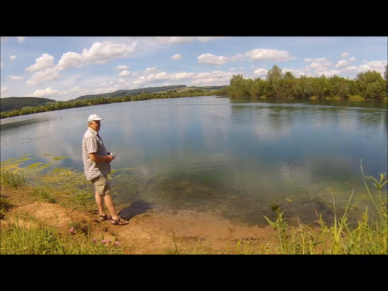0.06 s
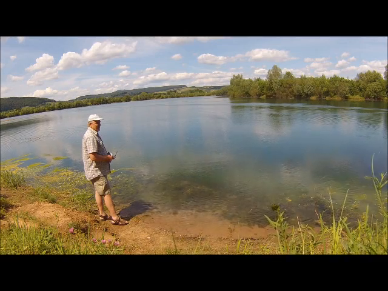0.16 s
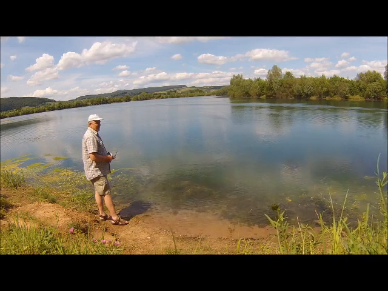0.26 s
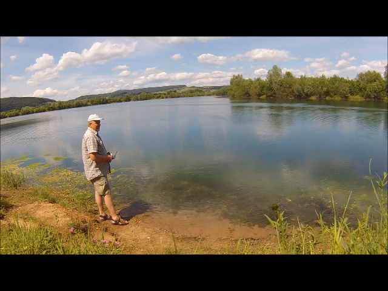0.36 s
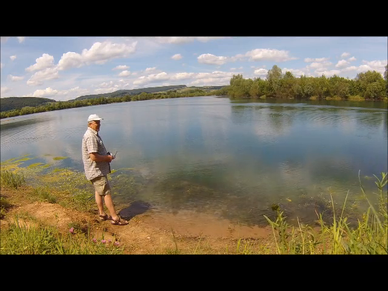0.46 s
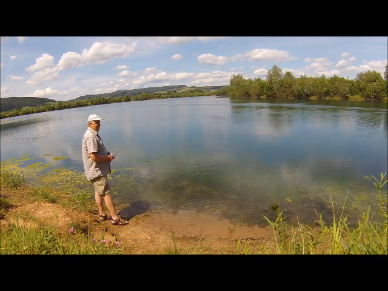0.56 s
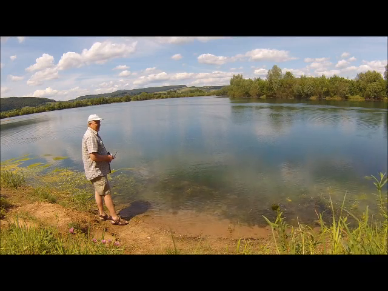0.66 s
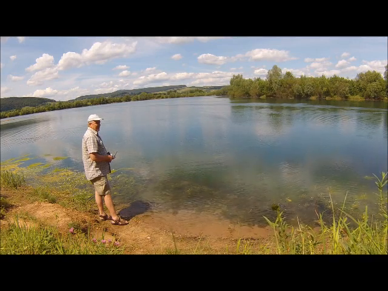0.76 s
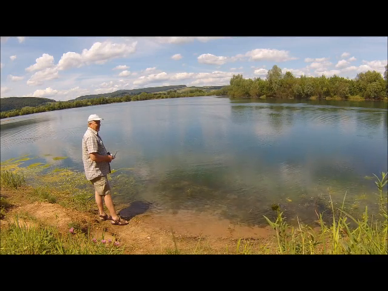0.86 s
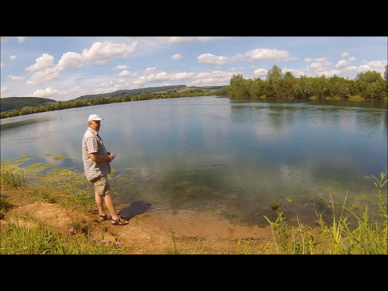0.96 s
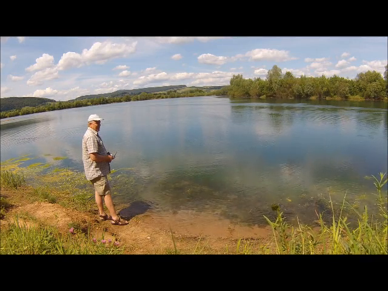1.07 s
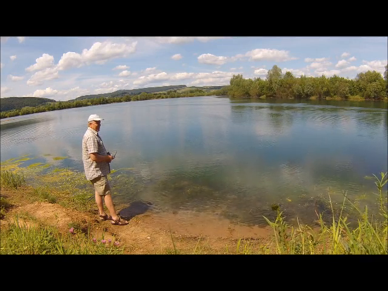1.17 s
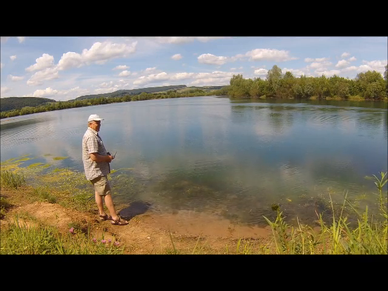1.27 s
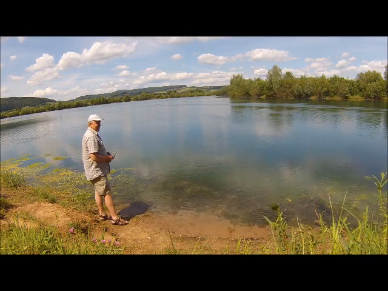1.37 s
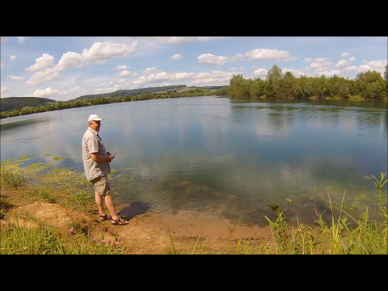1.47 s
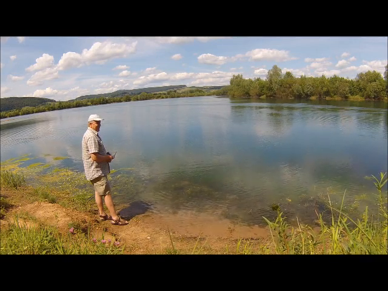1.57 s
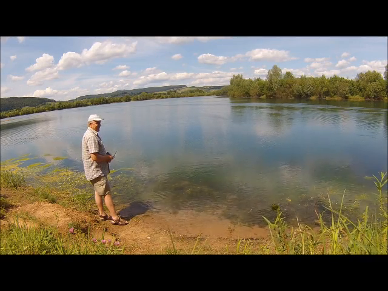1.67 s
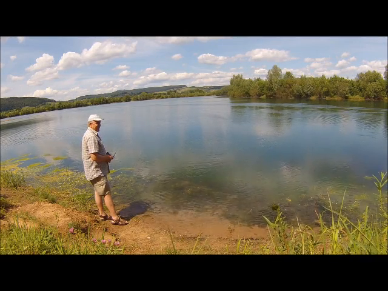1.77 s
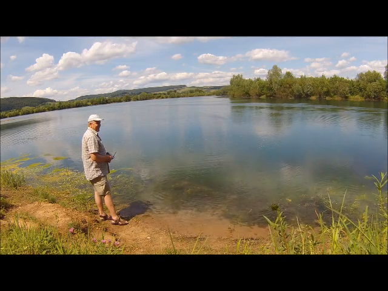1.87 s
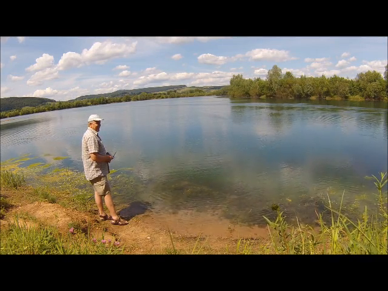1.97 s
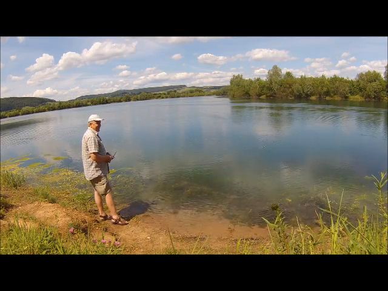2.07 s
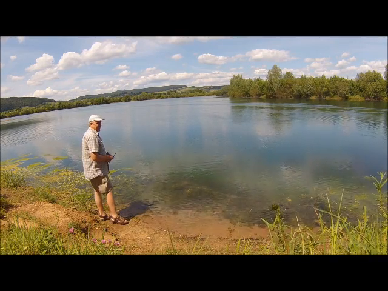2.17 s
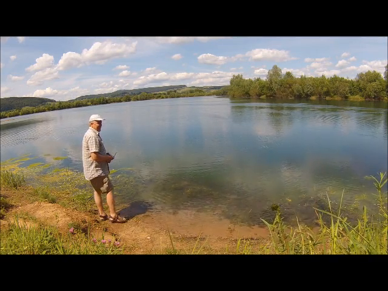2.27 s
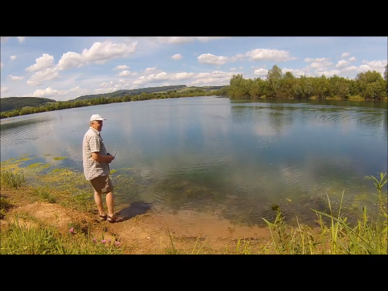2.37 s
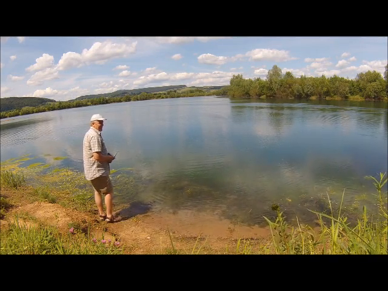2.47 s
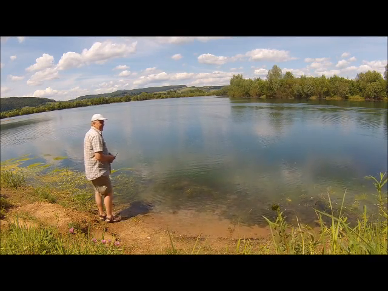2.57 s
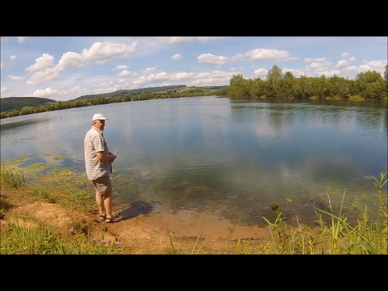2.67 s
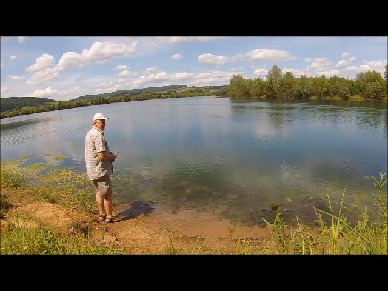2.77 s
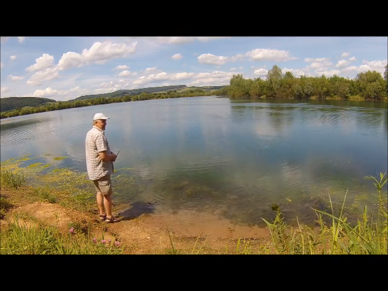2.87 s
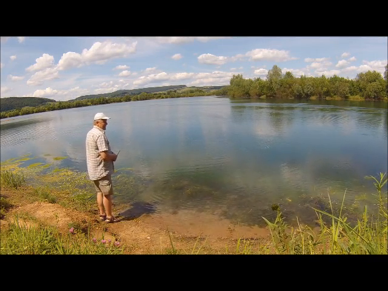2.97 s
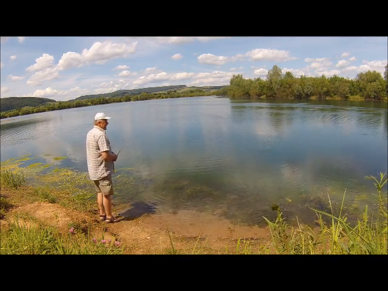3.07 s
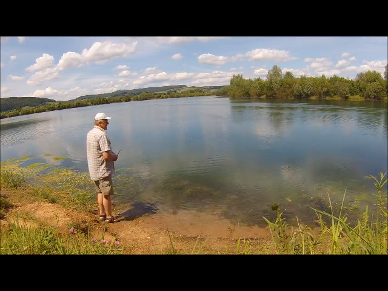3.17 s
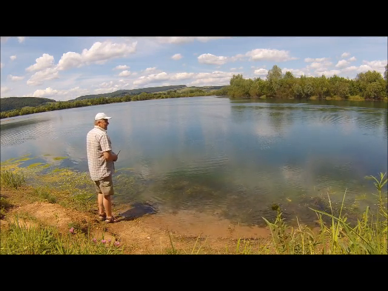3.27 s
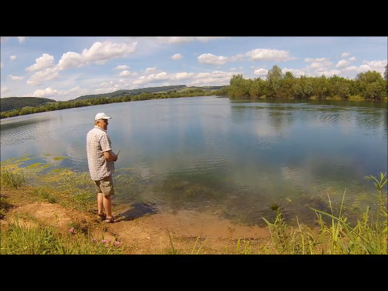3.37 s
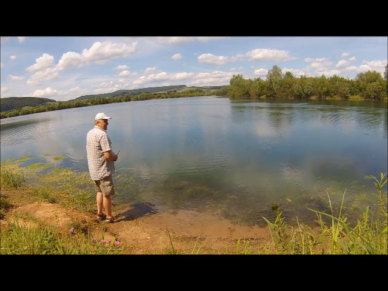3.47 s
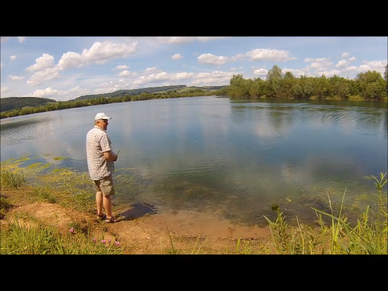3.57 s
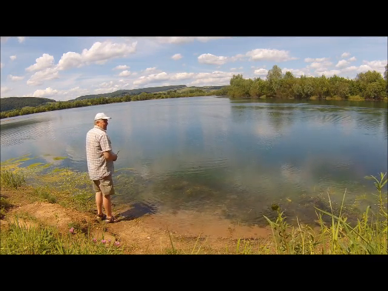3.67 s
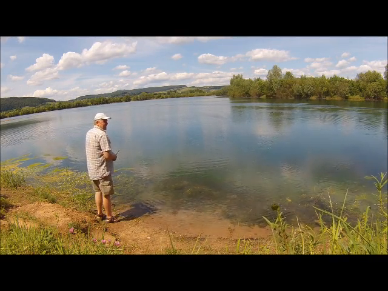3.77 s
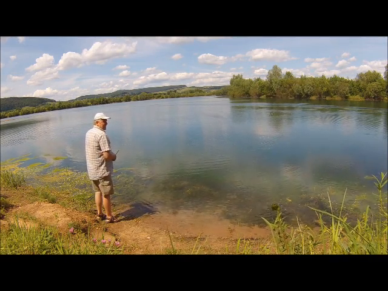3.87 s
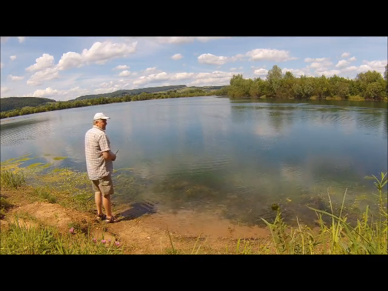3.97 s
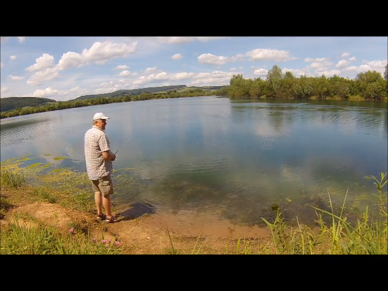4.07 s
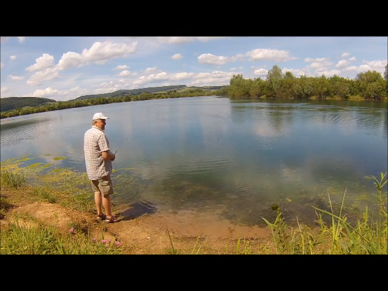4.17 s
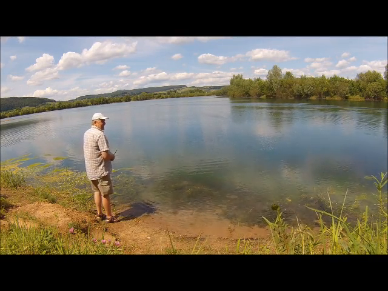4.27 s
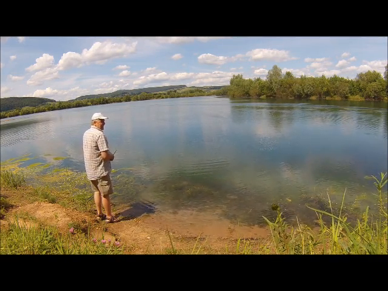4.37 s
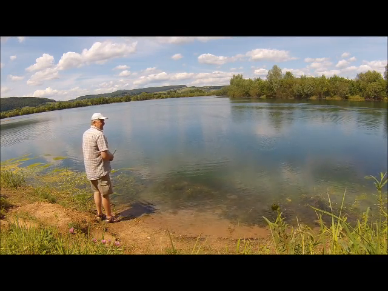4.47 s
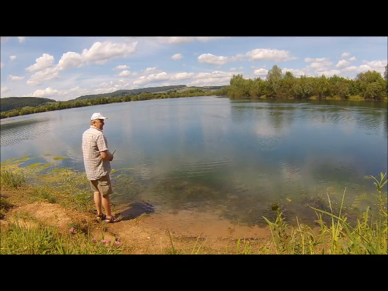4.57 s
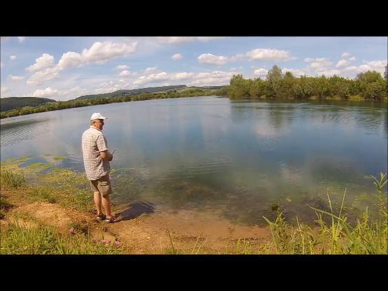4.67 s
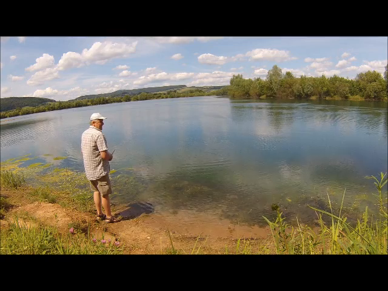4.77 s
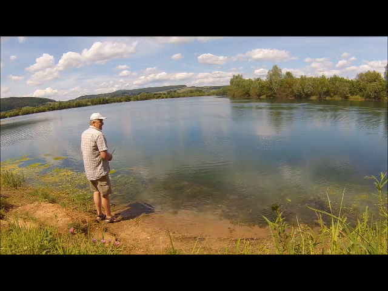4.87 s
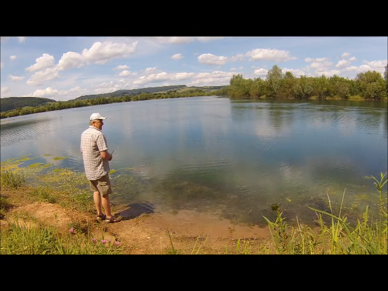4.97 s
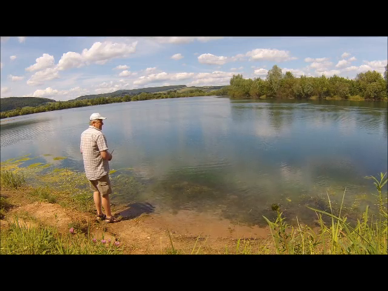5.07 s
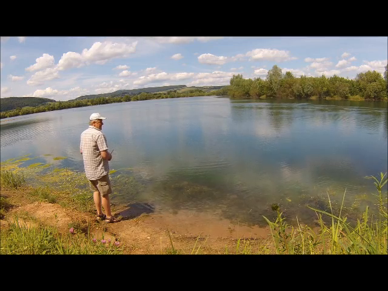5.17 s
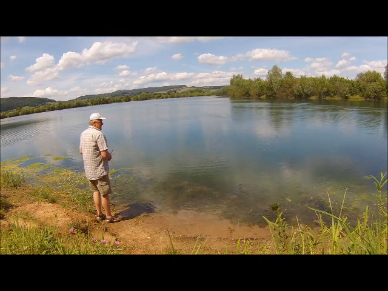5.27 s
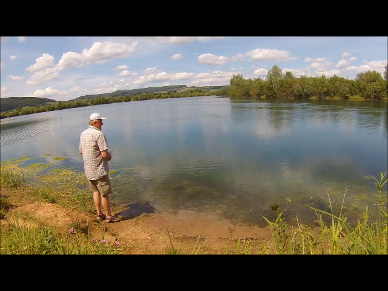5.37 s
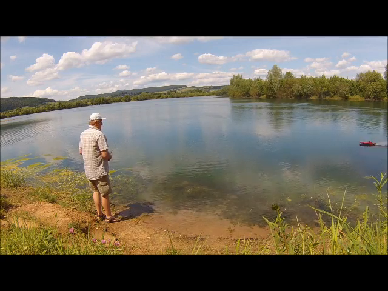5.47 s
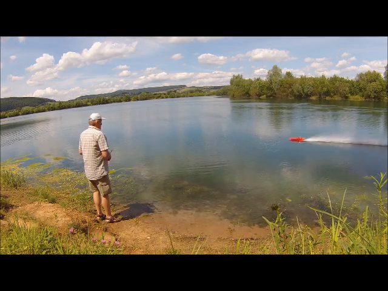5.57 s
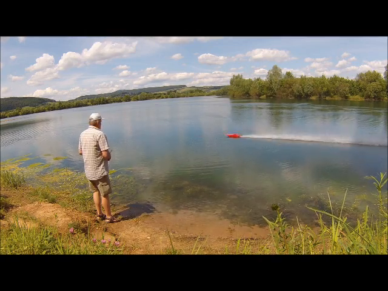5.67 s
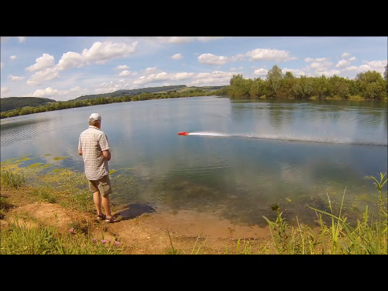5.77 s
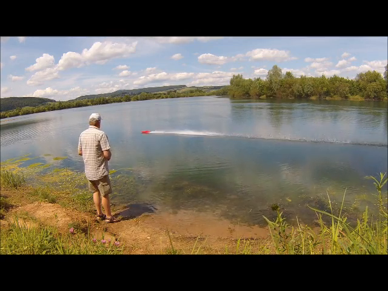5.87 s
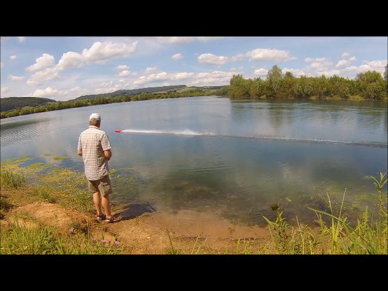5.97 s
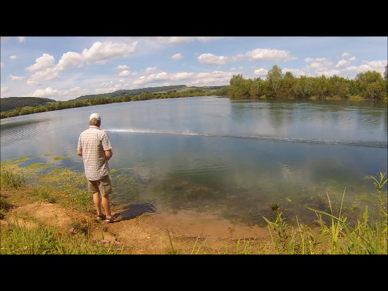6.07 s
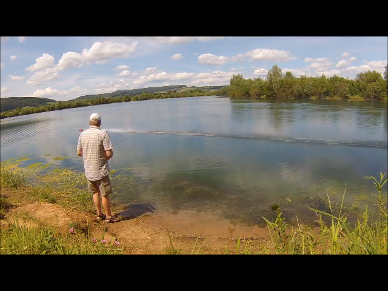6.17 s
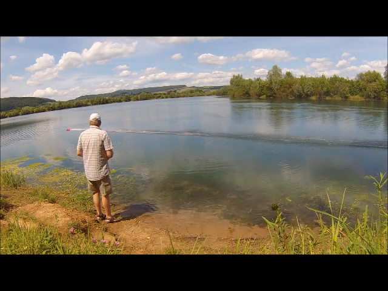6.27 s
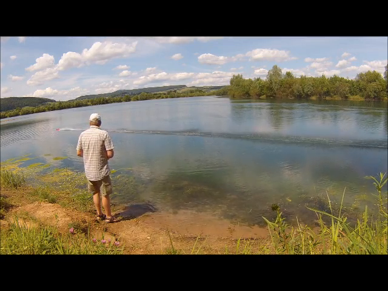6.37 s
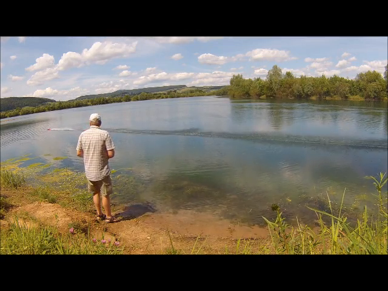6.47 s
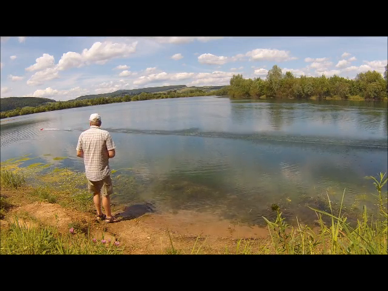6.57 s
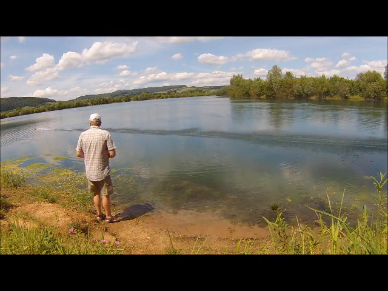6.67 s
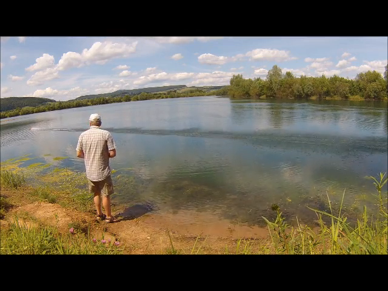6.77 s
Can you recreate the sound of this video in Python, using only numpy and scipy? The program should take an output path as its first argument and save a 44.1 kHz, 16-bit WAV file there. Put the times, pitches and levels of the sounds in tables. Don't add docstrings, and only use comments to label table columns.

```python
import sys
import numpy as np
from scipy import signal
from scipy.fft import rfft, irfft, next_fast_len
from scipy.io import wavfile
from scipy.ndimage import uniform_filter1d, minimum_filter1d

SR = 44100
rng = np.random.default_rng(int(sys.argv[2]) if len(sys.argv) > 2 else 0)


def ratio_of_db(decibels):
    return 10 ** (np.asarray(decibels, float) / 20)


def log_audio(samples):
    frames = np.atleast_2d(samples).T
    limited = np.clip(frames, -1, 1)
    pcm = np.round(limited * 32767).astype(np.int16)
    wavfile.write(sys.argv[1], SR, pcm)


N = 300321
T = np.arange(N) / SR

NEAR = np.clip((T - 2.25) / 0.02, 0, 1)
FULL = np.clip(np.minimum(T - 5.1, 5.86 - T) / 0.22, 0, 1)
COASTING = np.clip((T - 5.83) / 0.1, 0, 1)

# freq_hz, density_db_per_hz
SPRAY_SPECTRUM = [(790, 21), (1350, -12), (1460, -15.5), (1630, -18), (2040, -20), (2430, -14.5),
                  (2800, -3), (3590, -8.5), (4500, -15), (5850, -41), (9900, -120)]
# centre_s, level_db, length_s
SPLASHES = [(3.2, 0.5, 0.046), (4.47, 4, 0.011), (5.06, 3, 0.037), (5.13, 2, 0.017), (5.3, -2.5, .04),
            (5.5, -3.5, 0.028), (5.21, 6, 0.059), (5.4, 6.5, 0.061), (5.66, 3.5, 0.017), (5.88, -1, 0.039),
            (6.1, 2.5, 0.074)]
# centre_s, level_db, length_s
CHURN = [
    (2.4, 2, .15),
    (3.4, 3, 0.092),
    (3.9, 3, 0.19),
    (4.4, -6, 0.33),
    (4.66, 6, 0.066),
    (4.95, -1, 0.056),
    (5.42, 6, 0.13),
    (6.38, -1, 0.19),
    (6.68, 3.5, 0.11),
]


def curves(table):
    s, *columns = np.transpose(table)
    return [np.interp(T, s, column) for column in columns]


def bumps(rows):
    out = np.zeros(N)
    for s, size, length_s in rows:
        first = max(int((s - 3 * length_s) * SR), 0)
        part = slice(first, int((s + 3 * length_s) * SR))
        out[part] += size * np.exp(-((T[part] - s) / length_s) ** 2)
    return out


def colour_db(spectrum, hz):
    table_hz, table_db = np.transpose(spectrum)
    return np.interp(np.log(hz), np.log(table_hz), table_db)


def walk(rate_hz):
    hold = int(SR / rate_hz)
    steps = np.repeat(rng.standard_normal(N // hold + 1), hold)
    x = uniform_filter1d(uniform_filter1d(steps, hold), hold)[:N]
    return x / x.std()


def noise(spectrum, lo_hz, hi_hz, ref_hz=None, grain_db=0.0):
    size = next_fast_len(N)
    hz = np.arange(size // 2 + 1) * SR / size + 1
    power_order = 2 / 0.11
    edges = 1 / np.sqrt((1 + (lo_hz / hz) ** power_order) * (1 + (hz / hi_hz) ** power_order))
    grains_db = grain_db * np.minimum(rng.exponential(size=size), 6)
    source = rng.standard_normal(size) * ratio_of_db(grains_db)
    shaped = rfft(source) * ratio_of_db(colour_db(spectrum, hz)) * edges
    lo, hi = ref_hz or (lo_hz, hi_hz)
    power = 2 * np.sum(np.abs(shaped[(hz > lo) & (hz < hi)]) ** 2) / size ** 2
    return irfft(shaped, size)[:N] / np.sqrt(power)


def drive():
    shaft = shaft_motion()
    return shaft_and_blades(shaft) + pole_whine(shaft) + hull_rocking(shaft) + blade_slaps(shaft)


def shaft_motion():
    # start_s, shaft_hz, drive_db
    far = [
        (0.0, 140.6, -63),
        (.1, 139.7, -56.5),
        (.42, 118.1, -59),
        (.87, 118.1, -58.5),
        (1.05, 69.6, -70.5),
        (1.18, 53.3, -59.5),
        (1.27, 74, -71.5),
        (1.43, 157.4, -61),
        (2.17, 149.4, -59.5),
    ]
    # start_s, shaft_hz, drive_db
    run_in = [(2.271, 189.3, -57.5), (2.37, 212, -55), (2.8, 202.2, -54), (3.16, 329, -44),
              (3.59, 306, -47), (3.741, 327.4, -45.5), (3.9, 401, -45), (4.391, 383, -38.5),
              (4.56, 451, -35.5), (4.75, 441.8, -34), (4.89, 399, -37.5), (5.05, 430.2, -33.5),
              (5.26, 522.6, -25.5), (5.76, 499, -20), (5.84, 401, -31), (6.07, 305.2, -38.5),
              (6.45, 208.1, -36.5), (6.6, 210.6, -39), (6.81, 262.7, -43)]
    # centre_s, speed_change_percent, length_s
    surges = [(.45, 2.5, 0.027), (.54, -3, 0.034), (.67, 3, .04), (.755, -3.5, 0.042), (.93, 6, 0.053),
              (1.46, 6, 0.043), (1.595, -5.5, 0.075), (1.74, 1.5, 0.045), (1.93, -3, 0.07),
              (2.46, 8.5, 0.078), (3.21, 4.5, 0.029), (4.07, 3, 0.077), (4.21, -1.5, 0.054),
              (4.46, -2, 0.0283), (4.775, 9, 0.037), (3.39, 2.5, .07), (5.18, -3, 0.051), (5.31, 1, 0.03),
              (5.4, -3.5, 0.03), (5.48, 1.74, 0.03), (5.585, -2, .025), (3.96, 2, .04)]
    hz, drive_db = curves(far + run_in)
    hz = hz * (1 + bumps(surges) / 100)
    turn_rad = 2 * np.pi * np.cumsum(hz * (1 + 0.00413 * walk(30))) / SR
    return hz, drive_db, turn_rad


def tone(shaft, order, db, flutter_db, blur_rad=0.0):
    turn_rad = shaft[2]
    wander_rad = blur_rad * walk(40 + 4 * order) + 2 * np.pi * rng.random()
    flutter = 0.9 * walk(20 + 5 * order) + 0.3 * walk(11)
    return np.sqrt(2) * ratio_of_db(db + flutter_db * flutter) * np.sin(order * turn_rad + wander_rad)


def housed_db(shaft, order, db):
    # freq_hz, gain_db
    housing = [(200, 0.2), (650, 0), (800, 4), (1000, 2.5), (1300, -10.5), (1650, -13.5), (2100, -5),
               (2750, 6)]
    hz, drive_db, _ = shaft
    return drive_db + db + colour_db(housing, order * hz)


def shaft_and_blades(shaft):
    # centre_s, level_db, length_s
    shaft_fades = [(1.9, 3, 0.045), (3.16, 4, 0.15), (4.5, -4, 0.11), (4.58, -8, 0.019), (5.7, -9, 0.04),
                   (3.583, -38, 0.12), (3.9, -3, 0.023), (5.3, -2, 0.018), (4.46, 4.5, 0.048),
                   (5.326, -5, 0.037), (6.3, -8, 0.021), (3.67, 12, .04), (5.5, 1.5, 0.024),
                   (5.552, -20, .025), (3.4, -2, 0.026), (3.05, 3, 0.023), (5.62, 4, 0.015),
                   (5.738, -9, 0.022), (5.875, 16.5, 0.036), (5.5, 6.5, 0.022), (5.8, -7.5, 0.071),
                   (5.782, 13, 0.023), (5.96, 4.5, .025), (5.6, 5, .03), (5.7, -6, 0.034), (3.4, -6, 0.011),
                   (4.65, -17, 0.017), (3.6, -6, .015), (4.3, 3, .03), (5.25, 2.5, 0.034), (5.37, 4.5, .02),
                   (5.63, 1.5, 0.026), (6.4, 4, .03)]
    blade_fades = [(3.52, 5, .04), (.44, 6.5, 0.033), (0.91, -5, 0.041), (1.48, -10.5, 0.15),
                   (2.2, -11, 0.017), (2.364, -4, 0.1), (3.21, -24, 0.025), (3.59, -4.5, 0.086),
                   (3.73, 5.5, 0.029), (3.9, -31, 0.0061), (4.03, 8.5, 0.16), (4.11, -12, 0.013),
                   (4.2, -3, .04), (4.49, -6, 0.058), (4.62, -10, 0.0067), (4.69, -4, .012), (5.2, -2, .03),
                   (4.72, 3, .015), (4.745, -11, 0.0084), (4.78, -6, 0.018), (4.88, -8, .018),
                   (3.84, 3, 0.025), (3.1, -2, 0.026), (5.43, -4.5, 0.038), (5.5, -12, 0.024),
                   (5.555, 6, 0.017), (5.618, -11, 0.0089), (5.66, 10, 0.047), (5.742, -18, 0.012),
                   (5.772, 8, 0.016), (5.4, -7, .015), (5.885, 5, 0.029), (5.97, 9, 0.022), (6.35, 4, .03),
                   (6.42, 5, 0.029), (3.8, 1.5, .05), (3.3, -7, 0.034), (3.96, 2, .02), (4.41, -10, 0.0073),
                   (5.27, 3, .03), (5.335, -2.5, 0.014), (6.3, 4, .004), (.53, -10, .02), (.62, 4, .04),
                   (0.723, -8, .02), (0.835, 5, 0.041), (5.38, 3.5, 0.016), (5.14, -5, .02),
                   (5.02, -4.5, .05), (1.74, -13, 0.028), (1.69, 4, .025), (2.2, 3, 0.035), (1.7, -6, .05)]
    second_fades = [(1.92, 8, 0.27), (0.33, -2, .08), (1.73, 3, .06), (2.25, 8, 0.059), (2.4, -11, 0.033),
                    (2.52, 7.5, 0.075), (2.76, 7, 0.093), (3.4, -6, .05), (4.08, -13, .05),
                    (4.88, -12, 0.026), (5.4, 11.5, 0.073), (5.53, -5, 0.025), (6.25, 15, 0.047),
                    (5.9, 14, 0.034), (5.2, -4, .06), (5.31, -4, .03), (5.56, -4, .03), (4.27, -4.5, 0.098),
                    (4.52, -10, .015), (4.48, 4, .03), (4.62, 4, .02), (4.75, -8, 0.018), (5.02, 4, .03),
                    (3.08, 6, 0.041), (3.75, 7, 0.052), (4.03, 9, .03), (5.82, -6, .03), (5.25, -4, .03)]
    third_fades = [(2.6, -11, .15), (3.33, -10, 0.099), (3.52, 4, 0.05), (3.8, -2, .1), (4.45, -1, .1),
                   (4.9, 10, 0.037), (5.55, 4, 0.13), (5.9, 12, 0.058), (3.12, 3.5, 0.051),
                   (3.2, -7, 0.044), (4.65, 3, .06), (5.47, 6, .04), (4.0, 2, .06)]
    blade_db = 4 + bumps(blade_fades) - 9 * COASTING
    second_db = -4.5 - 4 * COASTING - 2 * (1 - NEAR) + bumps(second_fades)
    third_db = -6.5 + bumps(third_fades) - 9 * COASTING
    out = NEAR * tone(shaft, 1, housed_db(shaft, 1, bumps(shaft_fades)), 2.2, 0.37)
    out += tone(shaft, 2, housed_db(shaft, 1.81, blade_db), 1.4, 0.65)
    out += tone(shaft, 4, housed_db(shaft, 4.05, second_db), 4.0, 1.17)
    out += NEAR * tone(shaft, 3, housed_db(shaft, 3, third_db), 3.34, 0.89)
    return out


def pole_whine(shaft):
    # centre_s, level_db, length_s
    whine_fades = [(.06, -13.5, 0.13), (.54, -6, 0.056), (.75, -2, 0.028), (.82, 2, 0.022), (.96, 5, 0.044),
                   (1.09, 9.5, 0.036), (1.425, 7.5, 0.016), (1.84, 3.5, 0.071), (.2, -4, 0.028),
                   (1.28, 16, 0.05), (1.49, -24, 0.046), (1.648, -29, 0.0075), (1.0, 7, .015),
                   (.39, -4, 0.018), (.62, -12, .035), (.005, -8, .02), (.25, -11, 0.022),
                   (.79, -12, 0.016), (1.03, -8, .012), (1.13, 7, 0.046), (1.35, 4, .04), (.13, 5.5, .05),
                   (.45, -2, .03), (.69, 0, .03), (1.52, 10, .015), (1.58, 5, 0.018), (1.69, 5.5, 0.026),
                   (1.78, -11, .012), (2.08, 1, .03)]
    poles = 18
    sinking_db = -400 * np.maximum(T - 2.18, 0)
    whine_db = housed_db(shaft, poles, 2.1 + bumps(whine_fades) + sinking_db)
    braking = np.clip(1.2 - np.abs(T - 1.08) / 0.09, 0, 1)
    return tone(shaft, poles, whine_db, 3.5, 0.9) + braking * tone(shaft, 2 * poles, -75, 2.5)


def hull_rocking(shaft):
    # centre_s, level_db, length_s
    half_fades = [
        (5.3, -2, .04),
        (5.42, -5, .04),
        (5.52, -1, .03),
        (5.72, 3.5, .04),
    ]
    splash_db, churn_db = bumps(SPLASHES), bumps(CHURN)
    out = tone(shaft, 0.5, housed_db(shaft, 0.5, -7.5 + bumps(half_fades)), 2.5, 0.73)
    out += tone(shaft, 1.5, housed_db(shaft, 1.4, -6.5), 6.2, 0.35)
    out += tone(shaft, 5, housed_db(shaft, 4.9, -11 + 1.2 * splash_db + 1.6 * churn_db), 4.1, 1.25)
    out += tone(shaft, 6, housed_db(shaft, 4.9, -21 + 0.74 * splash_db), 5.4, 0.8)
    for order in (2.5, 3.5, 4.5, 5.5):
        order_db = -11 - 3 * (order > 5) + churn_db
        out += tone(shaft, order, housed_db(shaft, order, order_db), 2.3, 1.94)
    return FULL * out


def blade_slaps(shaft):
    # shaft_order, centre_s, level_db, length_s
    overtone_swells = [(6, 3.34, 5.5, 0.076), (7, 4.78, -10, .05), (7, 3.85, 6, .1), (8, 4.0, 5, .05),
                       (10, 3.92, 4, .08), (9, 4.8, 5, .08), (8, 5.6, 8, 0.064), (9, 5.4, -5, .08),
                       (9, 4.4, 0, .15), (5, 2.95, 2, .08), (6, 2.76, -8, .05), (7, 5.45, 2, 0.092),
                       (5, 4.06, -8, .15), (5, 4.5, -9, .15), (5, 4.8, -12, .1), (6, 4.6, 6.5, 0.054),
                       (6, 4.7, 10, .05), (8, 4.3, 9, .04), (8, 4.71, 9, 0.036), (7, 4.55, -8, 0.16),
                       (6, 4.98, 8, 0.049), (7, 4.93, 5, 0.046), (8, 4.2, -7, .03), (8, 4.78, -9, .04),
                       (6, 6.3, 9, .03), (6, 6.2, 5, .04), (6, 5.62, 12, 0.078), (8, 3.4, 3, .08),
                       (10, 3.35, 4, 0.081), (11, 3.3, 4, .06)]
    hz = shaft[0]
    load_db = wake_db(-41, 0.8, splash=0.6, churn=0.35) + 6 * np.log10(hz / 500) - 12 * COASTING
    planing = np.clip((hz - 370) / 40, 0, 1)
    out = np.zeros(N)
    for order in (1.5, 2.5):
        out += NEAR * planing * (1 - FULL) * tone(shaft, order, load_db - 11, 4.0, 0.55)
    for order in range(5, 14):
        swells = [row[1:] for row in overtone_swells if round(row[0]) == order]
        slope_db = -3 - 2.5 * (order % 2) - (order - 5)
        db = load_db + 0.45 * colour_db(SPRAY_SPECTRUM, order * hz) + slope_db + bumps(swells)
        gate = NEAR * (1 - FULL * (order == 5))
        out += gate * tone(shaft, order, db, 4.5, 0.27 * order)
    return out


def wake_db(db, slope, hull=0.0, splash=0.0, churn=0.0):
    # start_s, nearness_db, hull_contact_db
    wake = [(0, -65, 9), (1.1, -65.5, 3), (2.2, -64, 8), (2.52, -61, 3), (2.87, -59.5, 5), (3.1, -51, 4),
            (3.38, -53.5, -1.5), (3.62, -53, 0.5), (3.92, -47.5, -5), (4.2, -48.5, -4), (4.47, -42, -2.5),
            (4.9, -41.5, -1.5), (5.15, -33, 1.5), (5.7, -23, -0.5), (5.85, -34.5, 8.5), (6.08, -39, 14),
            (6.35, -44.5, 8.5), (6.81, -43, -2.5)]
    near_db, contact_db = curves(wake)
    level_db = db + slope * (near_db + 40) + hull * contact_db
    return level_db + splash * bumps(SPLASHES) + churn * bumps(CHURN)


def water():
    hops = walk(14)
    patter_db = wake_db(-48.5, 1.0, hull=0.29, splash=0.94, churn=0.69) + 1.1 * walk(25)
    patter = noise(SPRAY_SPECTRUM, 1440, 2410) * ratio_of_db(patter_db)
    return ratio_of_db(0.8 * hops + 0.44) * spray() + hull_slap(hops) + patter + landings()


def spray():
    # freq_hz, density_db_per_hz
    mist = [(2530, -27), (4300, 5), (4930, -5), (5670, 1), (6670, 1), (7030, 0), (8140, -13.5), (8890, -22),
            (9670, -32.5), (11100, -30), (12300, -37), (15000, -38)]
    # centre_s, level_db, length_s
    mist_gusts = [(3.0, 3, .04), (3.22, 2.5, .08), (3.6, -1, .08), (4.0, 1, 0.063), (4.33, -1, .05),
                  (4.57, 3, .03), (4.88, 1.5, 0.028), (5.03, 3, .03), (5.86, 2.5, 0.045), (5.98, -1, 0.035),
                  (6.43, 3.5, .02), (6.52, 3, .03), (6.7, 1.5, .08)]
    # centre_s, level_db, length_s
    grit = [
        (3.0, 7.5, .05),
        (3.37, 3, .07),
        (3.55, -1, .06),
        (3.73, 9, .05),
        (3.9, 4, .08),
        (4.05, 2, .06),
        (4.3, 2, .1),
        (4.95, -7, .06),
        (5.15, 5, .05),
        (6.25, 0.5, .1),
    ]
    gusts_db = bumps(mist_gusts)
    mist_db = wake_db(-41, 1.03, hull=0.054, splash=1.0) + gusts_db + 1.4 * walk(12)
    coarse_db = wake_db(-43, 1.095, hull=0.21, splash=0.74, churn=1.0) + 0.96 * walk(9)
    grit_db = wake_db(-45.5, 0.99, hull=0.01, splash=0.32, churn=0.55) + bumps(grit) + 0.95 * walk(12)
    finest_db = wake_db(-63.5, 1.0, hull=0.11, splash=0.41) + gusts_db + 1.45 * walk(7.6)
    out = noise(mist, 4760, 7380, grain_db=2.5) * ratio_of_db(mist_db)
    out += noise(SPRAY_SPECTRUM, 2510, 2796) * ratio_of_db(coarse_db)
    out += noise(SPRAY_SPECTRUM, 3210, 4560, grain_db=0.5) * ratio_of_db(grit_db)
    out += noise(mist, 8800, 17000, ref_hz=(9000, 15000), grain_db=3.2) * ratio_of_db(finest_db)
    return out


def hull_slap(hops):
    # freq_hz, density_db_per_hz
    slap_spectrum = [(65, -56), (110, -13.5), (145, -16.5), (215, -9.5), (260, -8), (366, -8), (555, -11.5),
                     (598, -7.5), (954, -2), (1400, -21), (1820, -46), (3080, -120)]
    # centre_s, level_db, length_s
    slap_lulls = [
        (4.4, -3.5, 0.1),
        (5.95, -1.5, .03),
        (4.9, 2, 0.089),
        (4.9, -2.5, .08),
    ]
    # centre_s, level_db, length_s
    thuds = [
        (3.65, -3.5, 0.079),
        (4.3, 3.5, 0.099),
        (4.62, 3, 0.027),
        (4.92, 4, .03),
        (5.42, -2, 0.095),
        (5.72, 3, .05),
        (5.93, 5, .04),
        (6.5, -2, .12),
    ]
    slap_db = wake_db(-37, 1.08, hull=0.75, splash=0.11) + bumps(slap_lulls)
    slap_db = slap_db + 2.0 * walk(35) + 0.19 * hops
    boom_db = wake_db(-42, 1.0, hull=0.41, splash=0.13) + bumps(thuds) + 1.5 * walk(36)
    slap = noise(slap_spectrum, 702, 1900, grain_db=2.0) * ratio_of_db(slap_db)
    return slap + noise(slap_spectrum, 121.5, 628) * ratio_of_db(boom_db)


def landings():
    # start_s, peak_db, ring_hz
    drops = [(5.845, -30, 805), (5.877, -21, 780), (5.94, -24, 963), (5.974, -10, 816), (5.998, -20, 964),
             (6.017, -17, 936), (6.112, -12, 848), (6.136, -15, 785), (6.174, -34, 984), (6.193, -26, 820),
             (6.232, -20, 990), (6.254, -16, 1000), (6.062, -18, 899), (6.035, -20, 950)]
    out, t = np.zeros(N), np.arange(SR // 16) / SR
    envelope = np.exp(-t / 0.01) * (1 - np.exp(-t / 0.00022))
    for start_s, db, hz in drops:
        out[int(start_s * SR):][:len(t)] += ratio_of_db(db - 1.5) * envelope * np.sin(2 * np.pi * hz * t)
    return out


def far_bank(tones):
    t = np.arange(SR // 2) / SR
    tail = rng.standard_normal(len(t)) * np.exp(-t / 0.09)
    return ratio_of_db(-15) * signal.fftconvolve(tones, tail / np.sqrt(np.sum(tail ** 2)))[:N]


def birds():
    # start_s, length_s, # start_hz, end_hz, level_db,
    # roughness_hz
    notes = [(.92, .13, 2340, 2350, -58, 10), (1.24, .09, 3270, 3050, -54, 60),
             (1.245, .11, 2850, 2600, -57, 200), (.38, .09, 4200, 4180, -59, 20),
             (.54, .15, 1720, 1630, -68, 15), (.66, .17, 1630, 1790, -63, 15),
             (.86, .1, 2800, 2760, -62, 30), (1.05, .12, 2300, 1960, -66, 15),
             (.6, .1, 3300, 3560, -68, 20), (.05, .08, 3280, 3280, -68, 20),
             (.1, .14, 4280, 4300, -67, 20), (2.07, .07, 4350, 4300, -68, 30)]
    out = np.zeros(N)
    for start_s, length_s, hz0, hz1, db, rough_hz in notes:
        part = np.clip((T - start_s) / length_s, 0, 1)
        hz = hz0 + (hz1 - hz0) * part + rough_hz * walk(400)
        level = ratio_of_db(db + 2.0 * walk(30)) * np.sin(np.pi * part) ** 0.38
        out += level * np.sin(2 * np.pi * np.cumsum(hz) / SR)
    return out


def wind():
    # centre_s, level_db, length_s
    gusts = [
        (.51, 8, 0.16),
        (.88, 9, 0.087),
        (1.52, 7, .07),
        (1.97, 8, 0.076),
        (2.4, 3.5, 0.18),
        (5.75, 8, 0.067),
    ]
    spectrum = [(15, 7.0), (30, 5.0), (45, -2.5), (70, 2.5), (140, -20.5)]  # freq_hz, density_db_per_hz
    wind_db = -47.5 - 0.73 * T + bumps(gusts) + 1.4 * walk(5.9)
    return noise(spectrum, 12.5, 140) * ratio_of_db(wind_db)


def shore():
    # freq_hz, density_db_per_hz
    wash = [(59, -34), (100, 3), (180, 7.5), (345, -22.5), (703, 1.5), (943, -33), (1290, -22.5),
            (1590, -20.5), (2420, -14), (2810, -39), (3050, -50), (4270, -31), (6910, -20.5), (9670, -25),
            (15000, -25.5)]
    return noise(wash, 62, 15400) * ratio_of_db(-57.5 + 1.1 * walk(12))


def camera_tone():
    # freq_hz, level_db
    lines = [
        (7045, -75),
    ]
    return sum(ratio_of_db(db) * np.sin(2 * np.pi * hz * T) for hz, db in lines)


def scene():
    # centre_s, level_db, length_s
    skips = [(5.236, -2.5, 0.0045), (5.332, -6, 0.0077), (5.373, -5.5, 0.0051), (5.404, -5, 0.0069),
             (5.475, -1, 0.0065), (5.5, -4, 0.0051), (5.752, -4, 0.0038), (5.8, 0, 0.013),
             (5.968, -4, 0.0047), (6.09, -3, .008), (6.126, -2.5, .006), (6.155, -2, 0.013),
             (5.433, -7.5, 0.0043), (5.588, -4.5, 0.0045), (5.618, -1, 0.011), (5.742, -2, 0.0077),
             (5.836, -1.5, 0.012)]
    tones = drive()
    chopped = tones * ratio_of_db(1.2 * walk(60))
    boat = ratio_of_db(bumps(skips)) * (chopped + far_bank(tones) + water())
    return (boat + birds() + wind() + shore() + camera_tone())[None, :]


def roll_off(x):
    return signal.sosfilt(signal.butter(12, 15170, fs=SR, output="sos"), x)


def record(dry):
    peak = -minimum_filter1d(-np.abs(dry), size=301, axis=1)
    crest = uniform_filter1d(peak, size=301, axis=1)
    held = dry / np.maximum(crest / 1.03, 1)
    return roll_off(np.clip(held, -1, 1))


dry = scene()
out = record(dry)
log_audio(out)
```